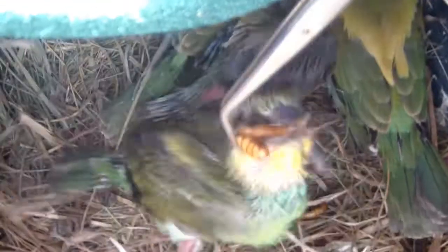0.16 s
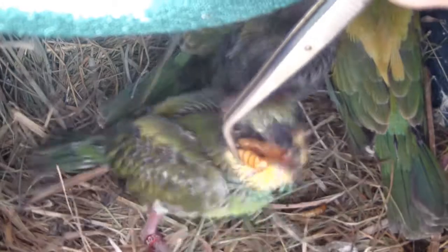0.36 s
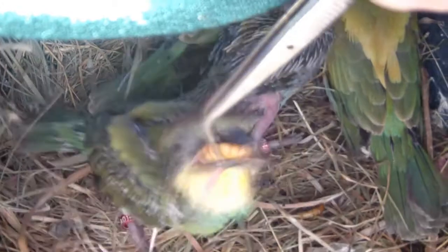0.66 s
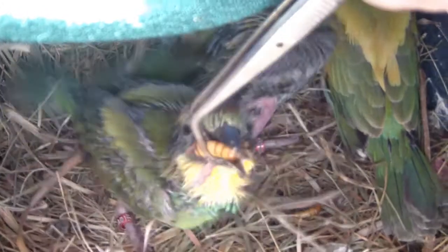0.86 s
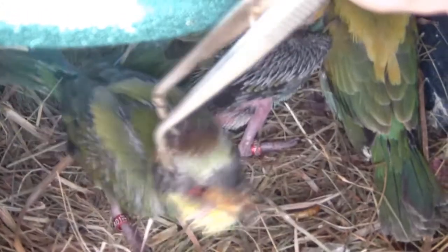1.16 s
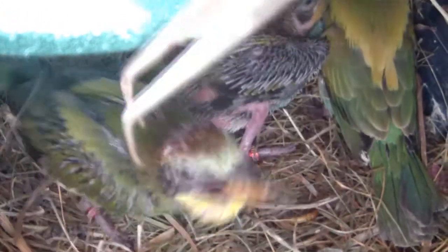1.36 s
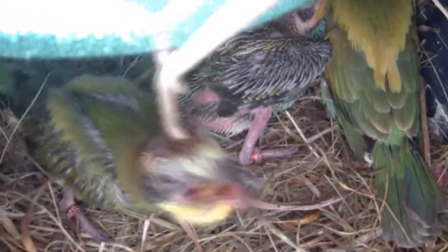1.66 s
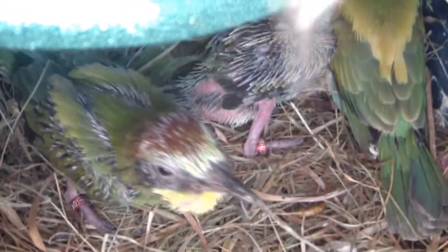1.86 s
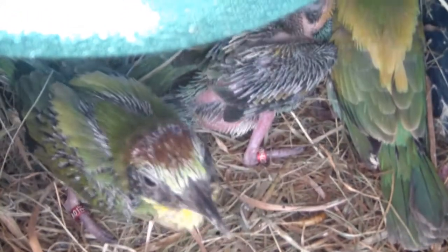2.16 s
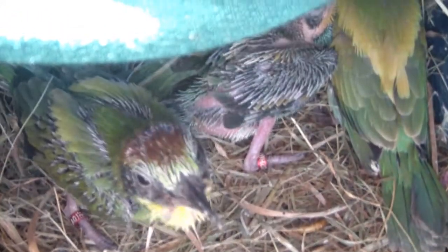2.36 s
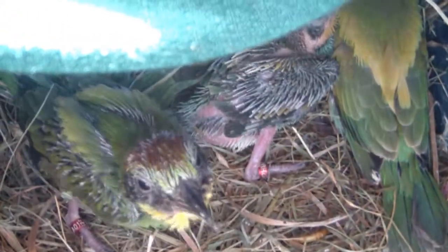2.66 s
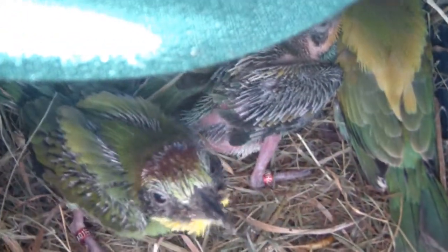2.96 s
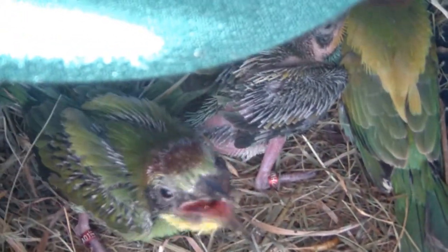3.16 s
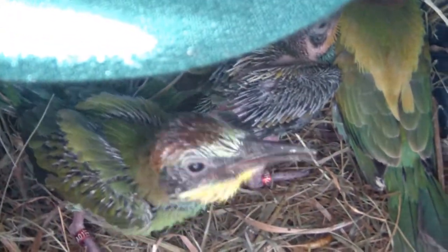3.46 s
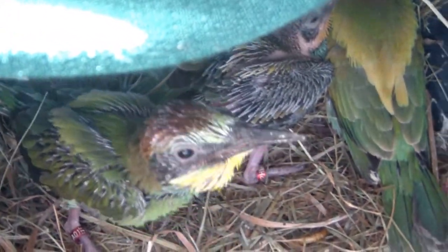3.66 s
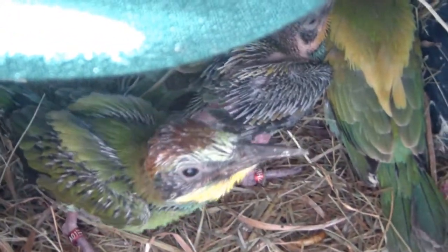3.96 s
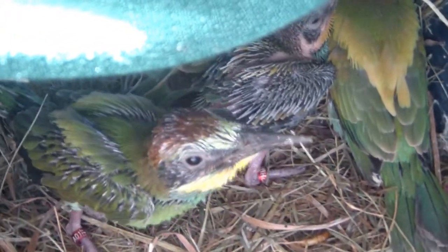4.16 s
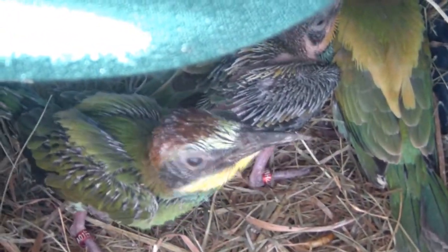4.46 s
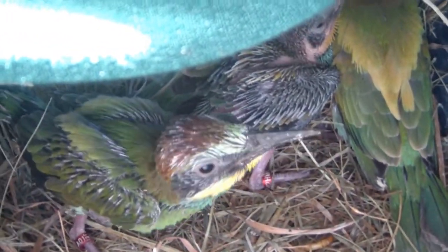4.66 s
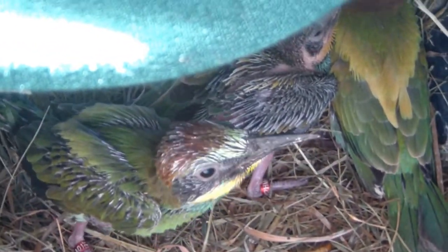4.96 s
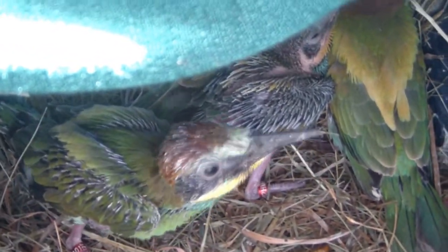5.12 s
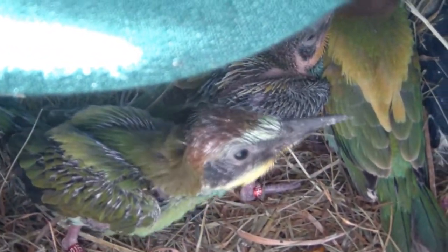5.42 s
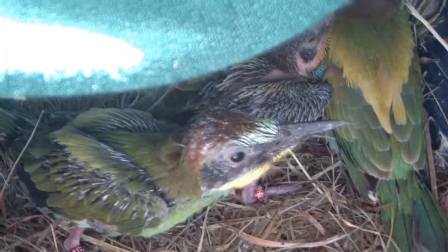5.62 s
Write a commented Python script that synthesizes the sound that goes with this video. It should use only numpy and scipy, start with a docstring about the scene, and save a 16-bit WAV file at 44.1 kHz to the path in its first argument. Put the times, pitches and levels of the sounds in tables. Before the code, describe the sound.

Indoors, a baby bird close by chirps in quick trilling runs, with soft thumps and dry scuffs from its straw-lined tub. The trills give way to single peeps and a burst of rustling, then a last trill ends hoarsely. Further away, other birds add thin whistles, sharp chips, squawks and brief screeches that echo off hard walls over a low ventilation rumble.

```python
"""A hand-fed nestling begs close by in rapid trills and single peeps, from a straw-lined tub.
Its syrinx flips between loud high notes and soft low sags; throat and beak colour the harmonics.
The chick gulps, shuffles in the straw and bumps the tub.
Further off, other birds whistle, chip, squawk and screech in a hard-walled, ventilated room."""
import sys
import numpy as np
from scipy import signal
from scipy.fft import rfft, irfft
from scipy.io import wavfile
from scipy.ndimage import uniform_filter1d, map_coordinates

SR = 44100
rng = np.random.default_rng(int(sys.argv[2]) if len(sys.argv) > 2 else 0)


def master(y):
    """Save y as 16-bit WAV."""
    cut = np.clip(np.atleast_2d(y).T, -1, 1)
    pcm = np.round(cut * 32767)  # scale
    wavfile.write(sys.argv[1], SR, pcm.astype(np.int16))


N = 255339
TOP_HZ = 16000

# (start [s], end [s], low register [Hz], its level [dB], its octave [dB], opening buzz [0-1],
#  upper harmonics [dB], rasp [0-1])
TRILLS = [(0, 0.068, 1550, -23.5, -24, 0, -33, 0.6), (0.123, .474, 1500, -24, -22.5, 0.18, -38.5, 0.95),
          (.546, 1.023, 1538, -20.5, -26, 0.07, -44, .49), (1.081, 1.466, 1514, -22, -28.5, 0.1, -42, 0.45),
          (1.532, 1.901, 1517, -21, -26.5, 0.02, -38, 0.18),
          (3.53, 3.912, 1378, -23.5, -26.5, 0.08, -38.5, 0.63)]
# (time [s], length [s], pitch [Hz], level [dB], octave [dB], opening buzz [0-1],
#  upper harmonics [dB], rasp [0-1])
PEEPS = [(2.021, 0.13, 1523, -12, -45, 0.2, -48, 0.1), (2.248, 0.13, 1551, -11.5, -56, 0.23, -48.5, 0.28),
         (2.535, 0.13, 1536, -11.5, -46, 0.2, -45.5, 0.8), (3.355, 0.11, 1557, -15.5, -28, 0.2, -35.5, 1)]


def chick():
    """Begging calls: trills, single peeps and a closing hoarse whine."""
    # (time [s], pitch [Hz], glide [Hz], level [dB], octave [dB], bow [ratio])
    whine = [(3.902, 1714, 125, -21.5, -23.5, -0.11), (3.934, 1550, -200, -22, -24, 0.26),
             (3.989, 1700, -400, -18, -22.5, -0.12), (4.04, 1142, -400, -30.5, -49, 0)]
    out = np.zeros(N)
    for start, end, low_hz, low_db, low_octave_db, buzz, upper_db, rasp in TRILLS:
        notes = trill_notes(start, end, low_hz, low_db, low_octave_db)
        add(out, notes[0, 0], syrinx(notes, end, buzz, upper_db, rasp))
    for s, length, hz, db, octave_db, buzz, upper_db, rasp in PEEPS:
        notes = peep_notes(s, length, hz, db, octave_db)
        add(out, s, syrinx(notes, s + length, buzz, upper_db, rasp, flick_hz=296, flick_s=0.00141,
                           flick_db=-12.5, bite_db=-2, kick_db=3, half_db=-25))
    add(out, whine[0][0], syrinx(np.array(whine, float), end_s=4.075, buzz=0.45, upper_db=-27, rasp=1.0,
                                 flick_hz=101, flick_db=0, harmonics=6))
    return out


def trill_notes(start, end, low_hz, low_db, low_octave_db):
    """About nine beats a second: each leaps high, may break and rebound, then sags until the next."""
    # (time [s], length [s], break after [s] or 0 if whole, pitch [Hz], level [dB], octave [dB],
    #  octave change at rebound [dB])
    all_beats = [(.005, .062, .021, 1904, -22.5, -12.5, 3), (0.122, 0.046, 0, 1981, -19, -12, 0),
                 (0.215, 0.041, 0.018, 1840, -16.5, -14.5, 3), (0.319, .053, .023, 1854, -14, -25.5, -4.5),
                 (0.424, .047, 0.029, 1864, -14, -22.5, 5), (0.543, 0.045, 0, 1932, -10.5, -23, 0),
                 (0.648, 0.049, 0.02, 1923, -15, -11, -23), (0.749, 0.045, 0.021, 1837, -12, -43, -4),
                 (0.857, 0.055, .024, 1799, -12.5, -48, -1), (0.959, .06, 0.025, 1857, -13, -37, 0),
                 (1.09, 0.049, 0, 1894, -11, -47, 0), (1.198, 0.048, 0.022, 1767, -13, -47, 11),
                 (1.304, 0.047, 0.023, 1798, -11.5, -53, 4), (1.408, .056, .019, 1783, -12.5, -56, 9),
                 (1.541, 0.047, 0, 1780, -10.5, -58, 0), (1.652, .05, .022, 1726, -12, -45, -6),
                 (1.754, .051, 0.021, 1755, -11.5, -19.5, -22), (1.86, 0.054, 0.017, 1734, -12, -20, -22),
                 (3.53, 0.037, 0, 1654, -12, -22.5, 0), (3.609, 0.039, 0.011, 1630, -13.5, -18, 1.5),
                 (3.697, 0.04, 0.012, 1636, -14, -14.5, -5), (3.782, 0.046, 0.017, 1666, -13.5, -15, -20),
                 (3.876, 0.029, 0.021, 1602, -12, -24, 0)]
    high_bow, low_bow, break_s = 0.24, 0.39, 0.0085  # bow: upward pitch curve at a note's ends
    whole_glide_hz, broken_glide_hz, sag_glide_hz = 257, -30, -208.5
    beats = [beat for beat in all_beats if start - 0.02 < beat[0] < end]
    notes = []
    for k, (s, length, first_s, hz, db, octave_db, change_db) in enumerate(beats):
        last = k == len(beats) - 1
        notes.append((s, hz, broken_glide_hz if first_s else whole_glide_hz, db, octave_db, high_bow))
        rebound_s = s + first_s + break_s
        if first_s and rebound_s < end:
            step_hz, glide_hz = (0, -143) if last else (120.8, 164)
            notes.append((s + first_s, low_hz, 0, low_db + 4, low_octave_db + 3.5, low_bow))
            notes.append((rebound_s, hz + step_hz, glide_hz, db + 1.7, octave_db + change_db, high_bow))
        if not last:
            notes.append((s + length, low_hz, sag_glide_hz, low_db, low_octave_db, low_bow))
    return np.array(notes, float)


def peep_notes(s, length, hz, db, octave_db, quaver_s=0.0111, fall_hz=91.5, glide_hz=-130):
    """A peep climbs in three steps, then quavers down and fades."""
    # held note, scoop, crest: (start [share of length], pitch [ratio], glide [Hz], level [dB], bow [ratio])
    climb = [(0, 1, 66, -0.5, 0.098), (.325, 1.04, -200, 0.2, 0.62), (0.591, 1.16, 60, 0.5, .3)]
    notes = [(s + share * length, hz * ratio, glide, db + step_db, octave_db, bow)
             for share, ratio, glide, step_db, bow in climb]
    for k, at in enumerate(np.arange(0.73 * length, length - quaver_s / 2, quaver_s)):
        fade_db = 1.5 * (k + 1)
        notes.append((s + at, 1.18 * hz - k * fall_hz, glide_hz, db - fade_db, octave_db - fade_db, 0))
    return np.array(notes, float)


def syrinx(notes, end_s, buzz, upper_db, rasp, flick_hz=400, flick_s=0.0013, flick_db=-9, kick_db=4,
           bite_db=11, half_db=-16, scoop_hz=220, hoarse_db=-18, harmonics=11):
    """One call: the syrinx jumps between two registers, and the pitch flicks up at every jump."""
    edges_s = np.append(notes[:, 0], end_s) - notes[0, 0]
    edges = np.maximum.accumulate(np.round(edges_s * SR).astype(int))
    n = edges[-1]
    index = np.repeat(np.arange(len(notes)), np.diff(edges))
    _, pitch_hz, glide_hz, level_db, octave_db, bow = notes[index].T
    since_s, until_s = (np.arange(n) - edges[index]) / SR, (edges[index + 1] - np.arange(n)) / SR
    position = since_s / (since_s + until_s) - 0.5
    opening, closing = index == 0, index == len(notes) - 1
    loud = np.clip((level_db + 21.5) / 11, 0, 1)  # the high register is loud and bright
    soft = 1 - loud
    flick = np.exp(-since_s / flick_s) * ~opening + np.exp(-until_s / flick_s) * ~closing
    hz = pitch_hz * (1 + bow * position ** 2) + glide_hz * position + flick_hz * flick * (0.26 + loud)
    hz -= scoop_hz * opening * np.exp(-since_s / 0.00578)
    phase = turn(uniform_filter1d(hz, size=40) * (1 + 0.018 * rasp * wander(n, 700)))

    # a flick carries the pitch past the throat resonance: the tone dips, then a loud note kicks in
    shape_db = flick_db * flick ** 2 + loud * (0.5 + kick_db * np.exp(-since_s / 0.0056)) - 1.5 * soft
    edge_db = bite_db * loud * np.exp(-since_s / 0.0032)  # scratchy onset of a leap
    bright_db = upper_db + flick_db * flick - 6 * soft + edge_db + 2 * opening
    first, second, upper = (uniform_filter1d(undb(db), size=50)
                            for db in (level_db + shape_db, octave_db + flick_db * flick, bright_db))
    voice = first * np.sin(phase) * undb(2.4 * rasp * wander(n, 400))
    # open-beak resonances on the octave: (frequency [Hz], gain [dB])
    beak = [(2700, -3.5), (3250, 1.5), (3550, -7), (3950, 1), (4400, -9.5), (5000, -20)]
    octave = np.sin(2 * phase + 0.57 * rasp * wander(n, 900))
    voice += second * gain_at(2 * hz, beak) * octave * undb(2 * wander(n, 291.2))
    # the soft register leaks a half-order tone; its uneven cycles smear the overtones
    voice += first * soft * undb(half_db) * wander(n, 201.8) * np.sin(3 * phase / 2)
    uneven_phase = phase + (0.1 * rasp + 0.2 * soft) * wander(n, 1200)

    # throat and beak on the upper harmonics: (frequency [Hz], gain [dB])
    throat = [(4400, 20), (5400, 15), (6500, -0.5), (8000, 0), (9200, -0.5), (10500, -5.5), (12500, 1),
              (15500, -13)]
    # a nearly shut beak (weak octave) also muffles harmonics 3 and 4
    muffle = undb(-9 * np.clip((level_db - octave_db) / 30, 0, 1))
    for k in range(3, harmonics + 1):
        # brief closure of the syrinx feeds mostly the highest harmonics
        closure = min(k / 5.5, 1) ** 2 * (0.7 + 0.6 * loud) * undb(4 * wander(n, 120))
        tract = (muffle if k < 5 else 1) * gain_at(k * hz, throat) * (k * hz < TOP_HZ)
        voice += upper * closure * tract * np.sin(k * uneven_phase)
    membrane = np.sin(turn(430 * (1 + 0.314 * wander(n, 211))))
    voice *= 1 + buzz * opening * (1 - position) * membrane
    air = (0.3 + 0.6 * rasp) * upper * band(rng.standard_normal(n), 3000, 14000)
    air += rasp * np.sqrt(first + second) * undb(hoarse_db) * band(rng.standard_normal(n), 1900, 4400)
    return (np.sqrt(2) * voice + air) * swell(n, 0.004 + 0.022 * abs(buzz), 0.018)


def gulps(length_s=0.063, delay_s=0.017, level_db=-38.5):
    """Air rings low in the open throat after each trill."""
    out, n = np.zeros(N), int(length_s * SR)
    for _, end, *_ in TRILLS:
        ring = band(rng.standard_normal(n), 536, 660) * swell(n, 0.01, 0.052)
        add(out, end + delay_s, undb(level_db) * unit(ring))
    return out


def bumps(decay_s=0.017, gain_db=-2, feeding_s=2.2, jostles_per_s=7):
    """Wings and body hit the tub, with light jostling during feeding: dull, quickly damped thuds."""
    # (time [s], level [dB])
    blows = [(.183, -26), (.295, -13), (.642, -16), (0.756, -21), (0.94, -24), (1.075, -18.5), (1.498, -20),
             (1.93, -16.5), (2.758, -13), (2.819, -12), (3.95, -11.5), (4.158, -20), (5.471, -22)]
    out, t = np.zeros(N), np.arange(SR // 8) / SR
    draws = rng.random((int(feeding_s * jostles_per_s), 2))
    jostles = [(when * feeding_s, -35 + 6 * size) for when, size in draws]
    for s, db in blows + jostles:
        thud = band(rng.standard_normal(len(t)) * t * np.exp(-2 * t / decay_s), 121, 257)
        add(out, s, undb(db + gain_db) * thud / np.abs(thud).max())
    return out


def scuffs(decay_s=0.0035, tail_s=0.048, tail_db=-14):
    """Dry scuffs of straws and of the opening beak, each with a brief rustling tail."""
    # (time [s], peak [dB])
    straws = [(0.286, -16), (.485, -14.5), (1.86, -13.5), (2.707, -10.5), (4.576, -22.5), (4.634, -21),
              (5.324, -19.5), (5.335, -22.5), (5.659, -23), (5.674, -26)]
    beak = [(s + 0.005, -18.5) for s, *_ in TRILLS] + [(s - 0.012, -14.5) for s, *_ in PEEPS]
    spectrum_hz_db = [(200, 3.0), (900, 12.0), (4000, 12.0), (8000, 0.5), (15000, -6.5)]
    out, t = np.zeros(N), np.arange(SR // 10) / SR
    for s, db in straws + beak:
        crack = colour(rng.standard_normal(len(t)), spectrum_hz_db)
        crack *= np.exp(-t / decay_s) + undb(tail_db) * np.exp(-t / tail_s)
        crack *= swell(len(t), 0.005, 0.03)
        add(out, s, undb(db) * crack / np.abs(crack).max())
    return out


def straw(spread_db=4, slips_per_s=7000):
    """Dense tiny slips of dry stalks as the chick shuffles."""
    # (time [s], length [s], level [dB])
    shuffles = [(0, 1.9, -53), (0.104, 0.42, -42), (0.622, 0.33, -42), (0.476, 0.1, -33),
                (1.036, 0.085, -31.5), (1.484, 0.088, -32.5), (2.159, 0.16, -34.5), (2.7, 0.45, -26.5),
                (3.058, 0.79, -35.5), (3.867, 0.55, -40.5), (5.369, 0.27, -42), (5.653, 0.19, -31.5)]
    # straw coloured by the tub: (frequency [Hz], gain [dB])
    spectrum = [(60, 8), (170, 15), (270, 11.5), (400, -0.5), (900, 4.5), (1400, -3.5), (5000, -13),
                (9000, -19.5), (15000, -21.5)]
    effort = np.zeros(N)
    for s, length, db in shuffles:
        add(effort, s, undb(db) * swell(int(length * SR), 0.002, length / 2))
    slips = (rng.random(N) < slips_per_s / SR) * rng.choice([-1, 1], N)
    sizes = undb(spread_db * np.minimum(rng.exponential(size=N), 4))
    return colour(slips * sizes, spectrum) * effort * undb(2.2 * wander(N, 60))


def whistles(jitter=0.085):
    """Gliding notes of other birds; fast pitch jitter turns the rough ones into rasps."""
    # (time [s], length [s], start [Hz], end [Hz], level [dB], roughness [factor])
    calls = [(1.449, 0.07, 4850, 5100, -33, 0.79), (1.508, 0.036, 5120, 5174, -20.5, 0.27),
             (1.918, 0.043, 4006, 5300, -27, 1.1), (1.967, 0.029, 5230, 6010, -21.5, 0.82),
             (2.208, 0.04, 3470, 4920, -26.5, 0.68), (2.426, 0.115, 2297, 2322, -35, 0.23),
             (2.498, 0.21, 3807, 3817, -37, 0.11), (2.739, .14, 2284, 2090, -34, 0.35),
             (3.031, 0.1, 8920, 7840, -33.5, 0.5), (3.436, 0.059, 3950, 4170, -30.5, 0.47),
             (4.196, 0.022, 5810, 6020, -23.5, 0.04), (4.267, 0.045, 5060, 5580, -25, 0.17),
             (4.357, 0.0398, 4450, 5280, -23, 0.05), (4.708, 0.053, 5920, 4950, -30, 0.44),
             (4.698, 0.12, 6870, 6280, -36, 0.24), (5.553, 0.026, 2604, 3250, -36.5, 0.56),
             (5.586, 0.079, 3176, 3020, -35.5, 0.11), (5.652, 0.1, 3150, 3980, -38.5, 0.37)]
    out = np.zeros(N)
    for s, length, from_hz, to_hz, db, rough in calls:
        n = int(length * SR)
        hz = np.linspace(from_hz, to_hz, n) * (1 + jitter * rough * wander(n, 1480))
        tone = np.sin(turn(hz)) * undb(4.7 * rough * wander(n, 476))
        add(out, s, undb(db) * unit(tone * swell(n, 0.0083, 0.0049)))
    return out


def chips(from_hz=8500, to_hz=6900, sweep_s=0.0202, spacing_s=0.018, step_db=-0.5):
    """Each chip is three quick overlapping downsweeps, each lower than the last."""
    # (time [s], level [dB])
    calls = [(0.086, -23.5), (1.048, -26), (2.08, -27.5), (3.173, -16.5), (4.221, -17)]
    out, n = np.zeros(N), int(sweep_s * SR)
    for s, db in calls:
        for k in range(3):
            hz = np.linspace(from_hz, to_hz, n) * (1 - 0.043 * k) * (1 + 0.043 * wander(n, 2000))
            sweep = unit(np.sin(turn(hz)) * swell(n, 0.006, 0.005))
            add(out, s + k * spacing_s, undb(db + k * step_db) * sweep)
    return out


def squawks(jitter=0.1073, settle_power=1.6):
    """Harmonic calls whose pitch slides and settles; jitter smears the rough ones."""
    # (time [s], length [s], start [Hz], end [Hz], level [dB], roughness [0-1])
    calls = [(2.857, 0.1, 2277, 1700, -25, 0.45), (3.054, 0.17, 2007, 1658, -27.5, 0.19),
             (3.28, 0.11, 1829, 1997, -17.5, 0.51), (5.149, 0.0612, 2806, 2566, -35, 0.22),
             (5.719, 0.075, 2695, 2410, -33, 0.7)]
    # (frequency [Hz], gain [dB])
    spectrum = [(1000, -30), (2100, -1.5), (3600, -17.5), (5500, 10), (6900, -1), (8500, 1.5), (10000, -14),
                (11700, -12.5), (15000, -32)]
    out = np.zeros(N)
    for s, length, from_hz, to_hz, db, rough in calls:
        n = int(length * SR)
        hz = to_hz + (from_hz - to_hz) * np.linspace(1, 0, n) ** settle_power
        phase = turn(hz * (1 + jitter * rough * (wander(n, 2500) + 0.5 * wander(n, 197.2))))
        tone = sum(gain_at(k * hz, spectrum) * (k * hz < TOP_HZ) * np.sin(k * phase)
                   for k in range(1, 10))
        call = unit(tone) + 0.5 * rough * colour(rng.standard_normal(n), spectrum)
        add(out, s, undb(db) * unit(call * swell(n, 0.03, 0.03)))
    return out


def screeches(jitter=0.1425, flutter_db=3, harmonics_db=(-3, 1, -4)):
    """A chaotic syrinx: three smeared harmonics slide down and flutter."""
    # (time [s], length [s], start [Hz], end [Hz], level [dB])
    calls = [(3.999, .16, 2596, 2426, -35), (4.202, 0.13, 3015, 2245, -23.5),
             (4.299, 0.12, 2257, 1686, -26.5), (4.414, 0.12, 2392, 2088, -30.5),
             (4.599, 0.13, 1708, 1680, -41), (5.07, 0.12, 1719, 1590, -41)]
    out = np.zeros(N)
    for s, length, from_hz, to_hz, db in calls:
        n = int(length * SR)
        smear = 1 + jitter * wander(n, 2500) + 0.0514 * wander(n, 151.7)
        phase = turn(np.linspace(from_hz, to_hz, n) * smear)
        call = sum(gain * np.sin(k * phase) for k, gain in enumerate(undb(harmonics_db), 1))
        call *= undb(flutter_db * wander(n, 153))
        add(out, s, undb(db) * unit(call * swell(n, 0.01, 0.042)))
    return out


def room(x, t60_s=0.81, treble_t60_s=0.86, early_db=5, early_s=0.031):
    """Strong early reflections, then the diffuse echo of hard walls."""
    t = np.arange(SR) / SR
    noise = rng.standard_normal((2, SR))
    tail = band(noise, 130, 4500) * undb(-60 * t / t60_s)
    tail += band(noise, 10530, 12100) * undb(-60 * t / treble_t60_s)
    tail *= swell(SR, 0.0015, 0.1) * (1 + undb(early_db) * np.exp(-t / early_s))
    return signal.fftconvolve(x[None], unit(tail) / np.sqrt(SR), axes=1)[:, :N]


def ventilation(air_db=-45, hum_db=-49, width=0.73):
    """Air rumble with a faint wavering hum."""
    # (frequency [Hz], gain [dB])
    spectrum = [(25, -62), (55, -5), (95, -8), (165, -3.5), (400, -13), (1000, -16.5), (3000, -22),
                (15000, -29.5)]
    t = np.arange(N) / SR
    centre = colour(rng.standard_normal(N), spectrum)
    sides = colour(rng.standard_normal((2, N)), spectrum)
    hum = sum(undb(3 * wander(N, 10)) * np.sin(2 * np.pi * hz * t) for hz in (50, 148, 198))
    return undb(air_db) * (centre + width * sides) + undb(hum_db) * place(hum, 3.4)


def undb(db):
    """Decibels to gain."""
    return 10 ** (np.asarray(db) / 20)


def unit(x):
    """Scale to rms 1."""
    return x / np.sqrt(np.mean(x ** 2) + 1e-18)


def gain_at(hz, points):
    """Gain of a (Hz, dB) spectrum at the given frequencies."""
    f, db = np.transpose(points)
    return undb(np.interp(np.log(np.maximum(hz, 1)), np.log(f), db))


def colour(x, points):
    """Filter by a (Hz, dB) spectrum; rms 1."""
    n = x.shape[-1]
    return unit(irfft(rfft(x) * gain_at(np.fft.rfftfreq(n, 1 / SR), points), n))


def band(x, lo_hz, hi_hz):
    """Causal band-pass."""
    sos = signal.butter(2, [lo_hz, min(hi_hz, SR / 2 - 1)], "band", fs=SR, output="sos")
    return signal.sosfilt(sos, x)


def wander(n, rate_hz):
    """Random drift of spread 1 with rate_hz new values a second."""
    steps = np.arange(n) * rate_hz / SR
    return map_coordinates(rng.standard_normal(int(steps[-1]) + 2), [steps], order=1) * np.sqrt(3 / 2)


def swell(n, rise_s, fall_s):
    """Envelope with rounded start and end."""
    t = np.arange(n) / SR
    return np.sin(np.pi / 2 * np.clip(np.minimum(t / rise_s, (t[-1] - t) / fall_s), 0, 1)) ** 2


def add(out, s, x):
    """Mix x into out at time s."""
    i = max(int(s * SR), 0)
    out[i:i + len(x)] += x[:max(len(out) - i, 0)]


def turn(hz):
    """Phase of a moving frequency."""
    return 2 * np.pi * np.cumsum(hz) / SR


def place(x, pan_db):
    """Pan by level, left minus right."""
    return x * undb(np.array([[pan_db], [-pan_db]]) / 2)


def scene():
    """The nest is close and dry; the other birds arrive mostly by way of the walls."""
    voice = chick()
    birds = whistles() + chips() + squawks() + screeches()
    nest = bumps() + gulps() + scuffs() + straw()
    # the tub's wall throws the treble unevenly to the two sides
    bounce = undb(-5.5) * np.roll(band(voice + nest, 7000, 16000), 9)
    treble = undb(-11) * band(voice + nest, 5000, 20000)
    near = place(voice, -1.43) + place(nest, 0.4) + (bounce + treble) * np.array([[-1], [1]])
    near_echo = undb(-20.5) * room(voice) + undb(-25) * room(nest)
    far = undb(-3) * place(birds, -3.1) + undb(0.5) * place(room(birds), -1.4)
    return near + near_echo + far + ventilation()


def record(dry):
    """Clip at full scale, then low-pass."""
    return signal.sosfilt(signal.ellip(10, 0.2, 80, TOP_HZ, fs=SR, output="sos"), np.clip(dry, -1, 1))


dry = scene()
out = record(dry)
master(out)
```